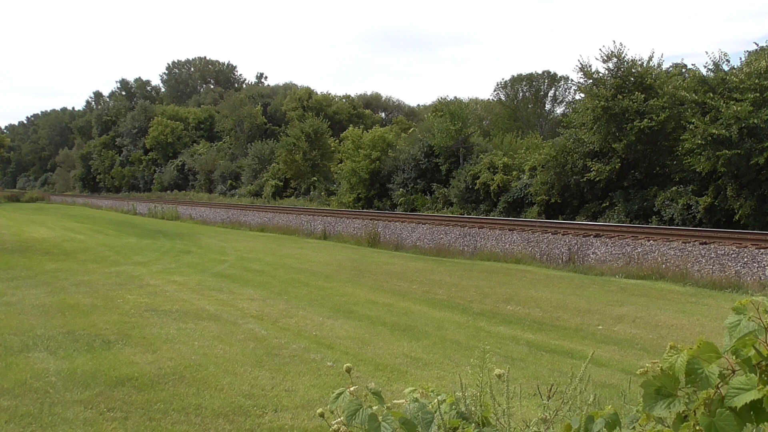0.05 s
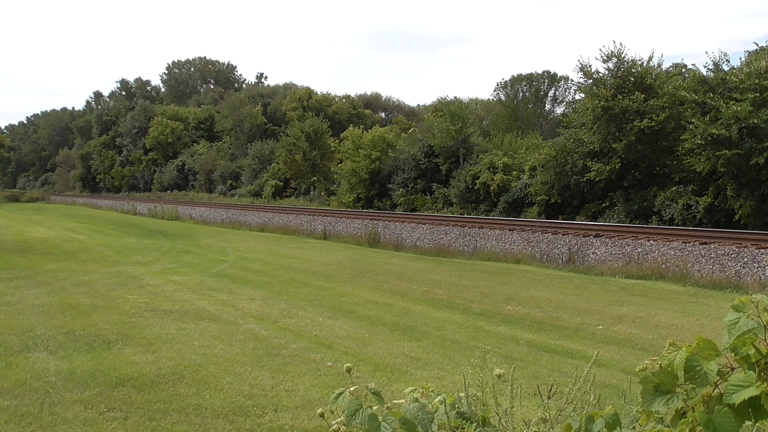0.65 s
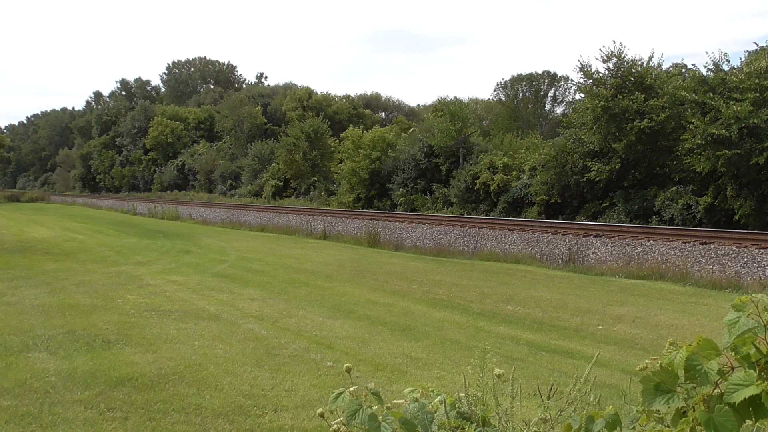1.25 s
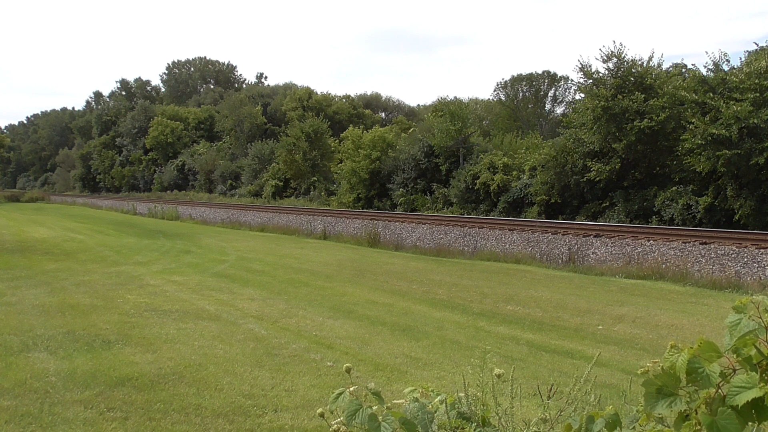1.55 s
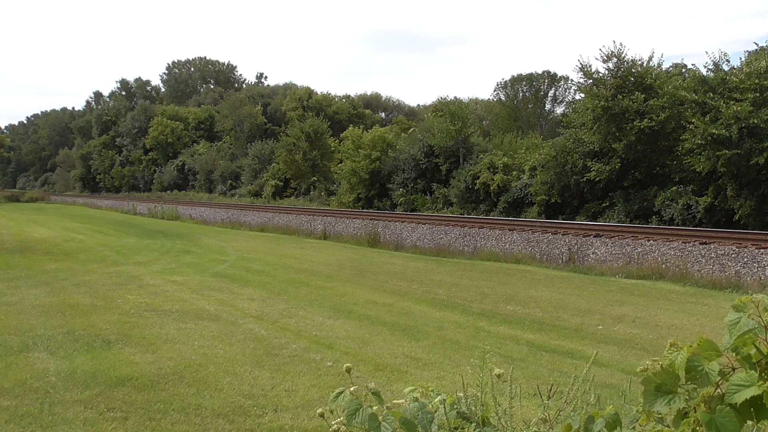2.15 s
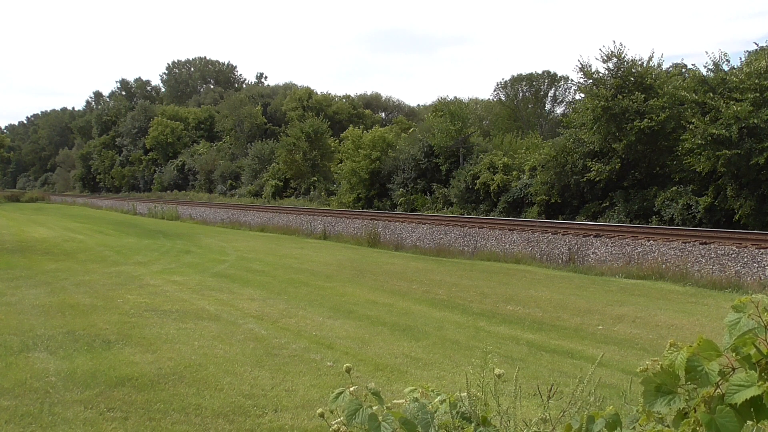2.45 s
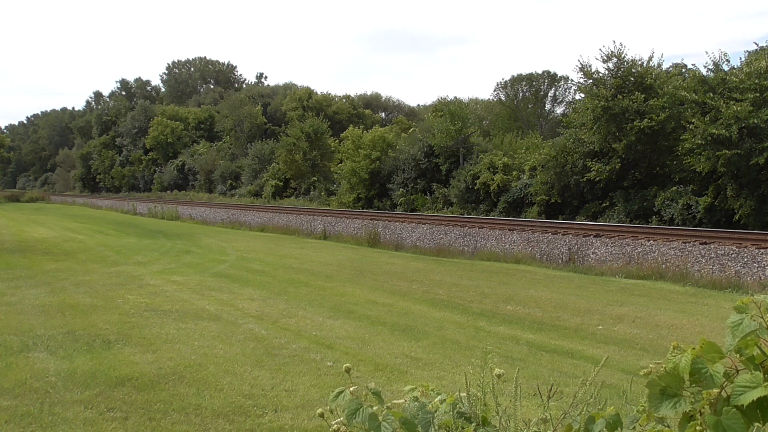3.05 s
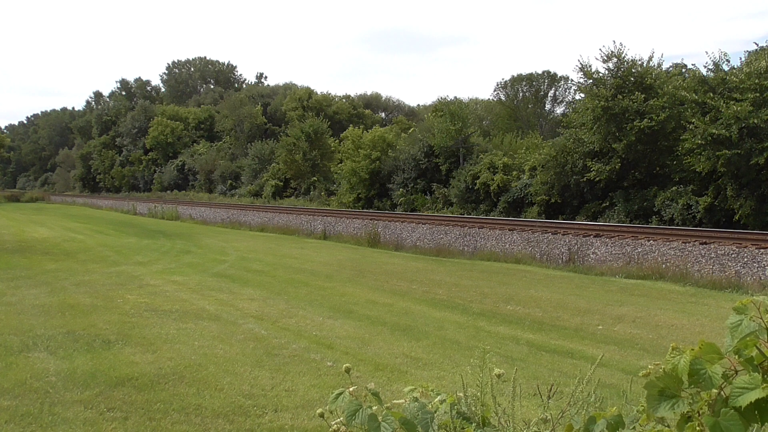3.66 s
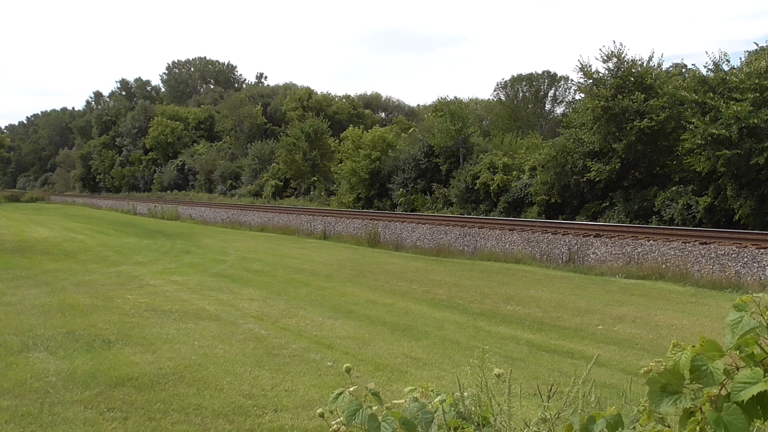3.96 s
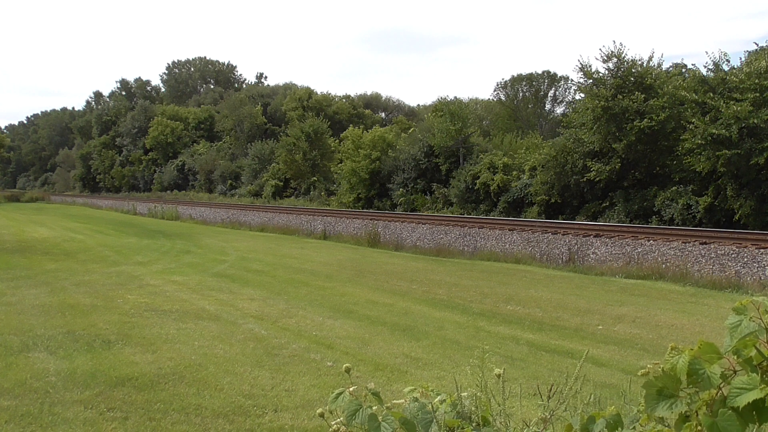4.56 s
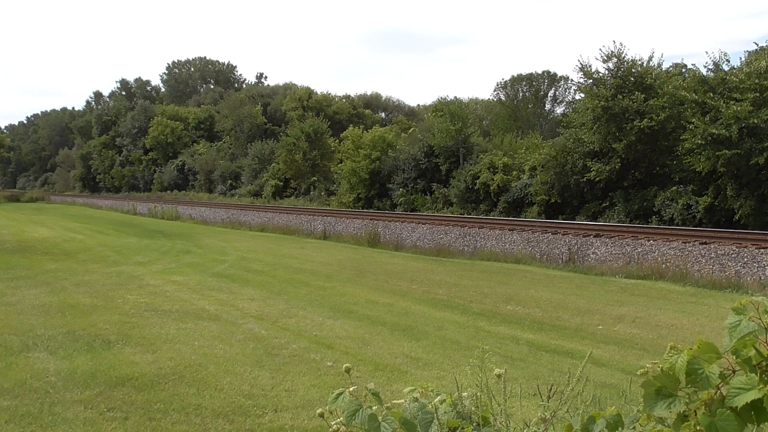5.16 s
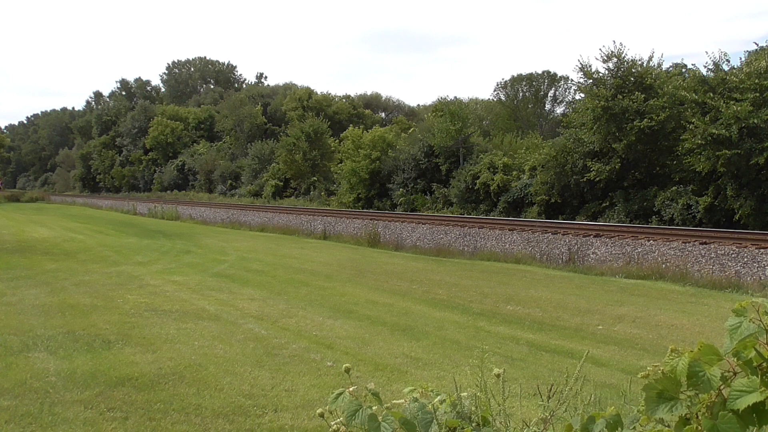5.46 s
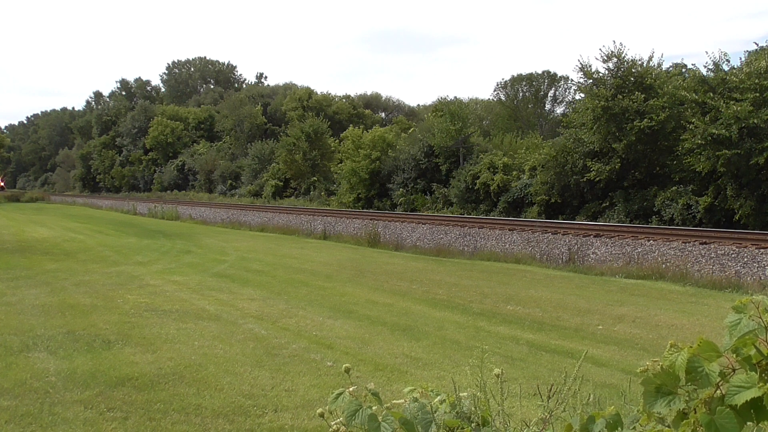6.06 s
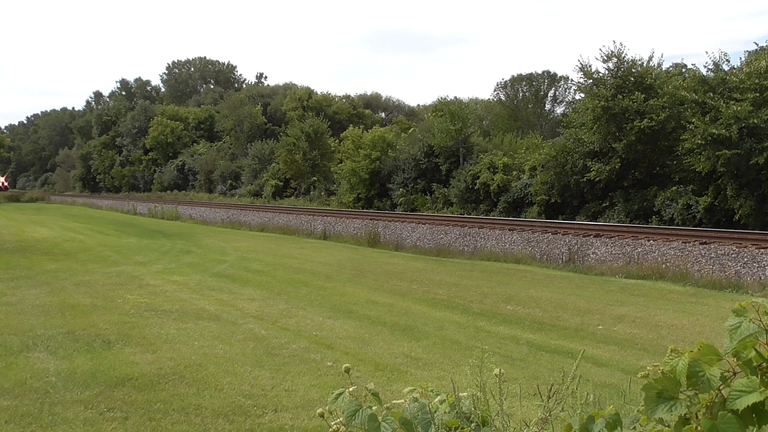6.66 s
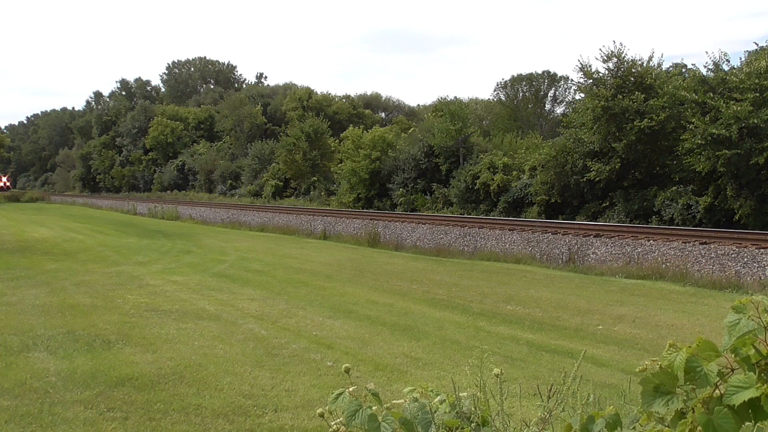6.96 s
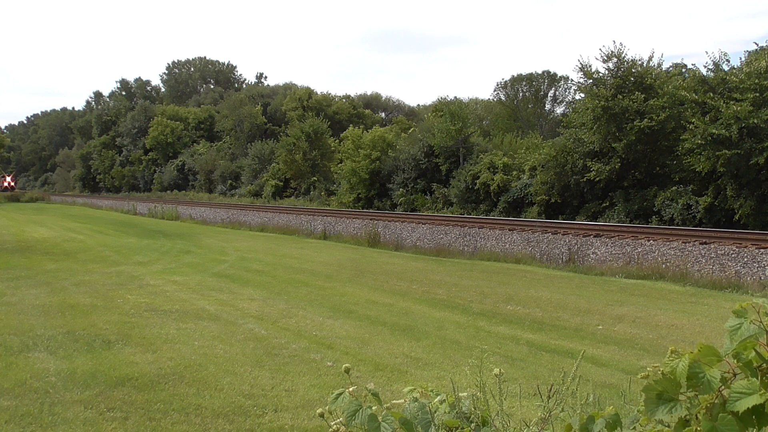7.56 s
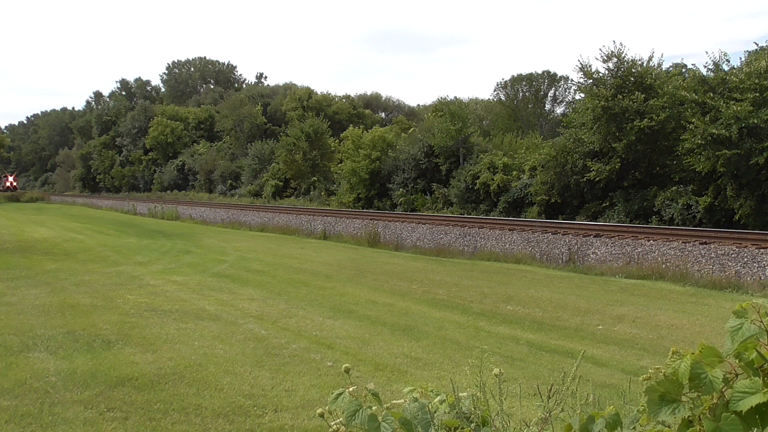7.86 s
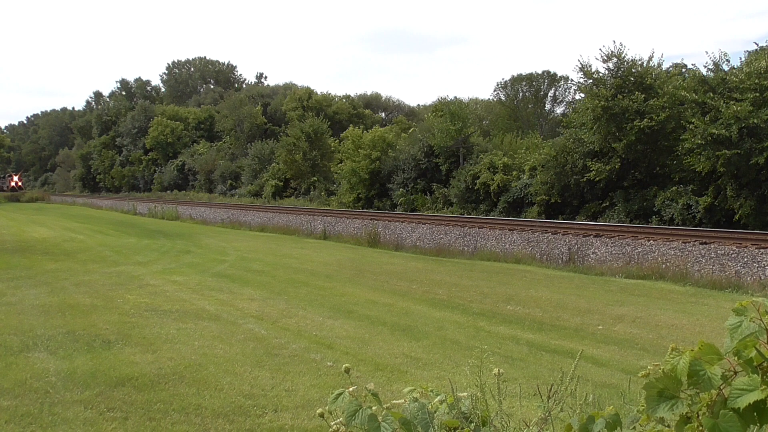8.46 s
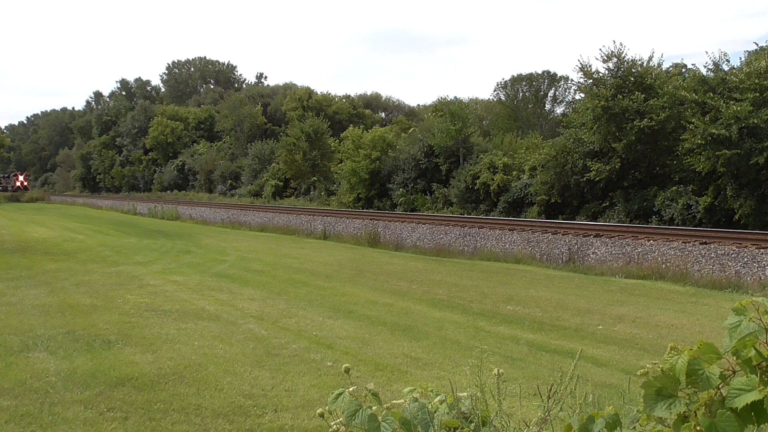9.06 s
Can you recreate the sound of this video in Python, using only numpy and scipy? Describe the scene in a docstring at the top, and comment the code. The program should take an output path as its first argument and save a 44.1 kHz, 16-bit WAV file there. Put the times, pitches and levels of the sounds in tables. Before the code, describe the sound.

Crickets trill close by while a distant diesel train rumbles and throbs, slowly growing louder as its wheels hiss.

```python
"""A summer meadow, a microphone pair in the grass, a diesel freight train a good way down the line.
From the start crickets trill close by, scraping their wings, and a katydid ticks and buzzes now and then;
far off, the exhaust throbs over a low rumble and the cooling fans drone. As the train draws nearer,
its wheels hiss more and more. Past halfway the rails, rubbed by the wheels, start to sing ahead of it.
At the end the train is louder, but still distant."""
import sys
import numpy as np
from scipy import signal
from scipy.fft import rfft, irfft
from scipy.io import wavfile

SR = 44100
rng = np.random.default_rng(int(sys.argv[2]) if len(sys.argv) > 2 else 0)


def bounce(signal):
    """Save signal as a 16-bit WAV file at the path given by the first command-line argument."""
    frames = np.transpose(np.atleast_2d(signal))
    limited = np.clip(frames, -1, 1)
    pcm = np.round(limited * 32767).astype(np.int16)
    wavfile.write(sys.argv[1], SR, pcm)


N = 410571
T = np.arange(N) / SR
HZ = np.fft.rfftfreq(N, 1 / SR)
SHAFT_HZ = 11.927  # crankshaft turns a second


def amp(db):
    """Decibels to gain."""
    return 10 ** (np.asarray(db) / 20)


def unit(x):
    """Scales to an rms of one."""
    return x / np.sqrt(np.mean(abs(x) ** 2) + 1e-20)


def over_frequency(rows, column=1):
    """One column of a table, interpolated along log frequency for every bin."""
    table = np.array(rows)
    return np.interp(np.log(HZ + 1), np.log(table[:, 0] + 1), table[:, column])


def level(rows):
    """Rows of t/s, level/dB as a gain for every sample."""
    return amp(np.interp(T, *np.transpose(rows)))


def approach(far_db, near_db, bend):
    """Gain that grows as the train closes in; a bend above one keeps the rise for late."""
    return amp(far_db + (near_db - far_db) * (T / T[-1]) ** bend)


def swell(start, length, rise_s, fade_s):
    """Rises, holds until its length is over, then dies away."""
    age = T - start
    return np.clip(age / rise_s, 0, 1) * np.exp(-np.maximum(age - length, 0) / fade_s)


def drift(per_s):
    """Complex random wander of rms one, changing about per_s times a second."""
    f = np.fft.fftfreq(8192, 10 / 8192)
    white = rng.standard_normal(len(f)) + 1j * rng.standard_normal(len(f))
    wander = np.fft.ifft(white * np.exp(-.5 * (f / per_s) ** 2))
    return np.interp(T, np.linspace(0, 10, len(f)), unit(wander))


def noise(spectrum, column=1):
    """Two unrelated noises of one colour, at an rms of one."""
    return unit(irfft(rfft(rng.standard_normal((2, N))) * amp(over_frequency(spectrum, column)), N))


def nearing_noise(spectra):
    """Noise whose colour passes from the far spectrum to the near one."""
    near = T / T[-1]
    return np.sqrt(1 - near) * noise(spectra, column=1) + np.sqrt(near) * noise(spectra, column=2)


def mic_pair(pair, likeness, balance_db, lead_rad):
    """Two unrelated sounds become left and right; balance and lead are left over right."""
    a, b = rfft(pair)
    side = amp(balance_db / 2) * np.exp(.5j * lead_rad)
    return irfft(np.array([a * side, (likeness * a + np.sqrt(1 - likeness ** 2) * b) / side]), N)


def far_crickets(gain_db=-3, delay_s=.006, width_s=.01, blur=.74, count=120, balance_db=-3):
    """Lower-voiced crickets farther off: each chirp is one soft stroke, blurred by the grass."""
    # the clearest chirps: t/s, relative level/dB, f/Hz
    clear_chirps = [(0.3336, -52, 4970), (0.8044, -51, 4940), (0.8824, -56, 5030), (1.2276, -51, 4930),
                    (1.942, -54, 4920), (2.4134, -53, 4950), (2.9213, -51, 4920), (3.3877, -53, 4930),
                    (4.1255, -53, 4940), (4.5725, -52, 4960)]
    when, size, pitch = rng.uniform(-1, 1, (count, 3)).T
    faint_chirps = zip((when + 1) / 2 * T[-1], -58.5 + 2.5 * size, 4900 + 140 * pitch)
    chirps = np.zeros(N, complex)
    for s, db, hz in [*clear_chirps, *faint_chirps]:
        span = slice(*np.searchsorted(T, [s - 5 * width_s, s + 5 * width_s]))
        envelope = amp(gain_db + db) * np.exp(-((T[span] - s - delay_s) / width_s) ** 2)
        chirps[span] += envelope * np.exp(2j * np.pi * hz * T[span])
    tone = (chirps * unit(1 + blur * drift(69.9))).real
    side = amp(balance_db / 2)
    return np.array([tone * side, tone / side])


def cricket_chorus(level_db=-52, flicker_db=3):
    """Many crickets across the meadow merge into a wide, flickering band of noise."""
    # colour of the chorus: f/Hz, relative density/dB
    spectrum = [(3000, -40), (4900, -15.5), (6100, -20), (6750, -6.5), (7500, 0), (8300, -0.5),
                (8700, -8.5), (9000, -9), (9250, -21), (12500, -22), (15800, -39)]
    chorus = amp(level_db + flicker_db * drift(35).real) * noise(spectrum)
    return mic_pair(chorus, likeness=.22, balance_db=.46, lead_rad=1.05)


def trill(who, count, first, last, slowing, rasp=.24, uneven_db=.72, uneven_length=.06, overtone_db=-37):
    """Each stroke drags a scraper over the wing's file: a short rasping tone that sags at its end."""
    # one wing stroke for each of two kinds of cricket: t/s from its middle, pitch factor, relative level/dB
    strokes = [
        [(-.013, .98, -24), (-.007, .988, -1.5), (-.002, 1, -0.5), (.003, 1.006, -0.5), (.007, .975, -5),
         (.011, .93, -35)],
        [(-.016, 1, -30), (-.009, .99, 1), (-.004, 1.003, 2.5), (.001, 1.008, -3.5), (.006, .99, -1),
         (.011, .95, -1.5), (.016, .91, -28)],
    ]
    # the singers: kind, f/Hz, level/dB, left minus right/dB, left lead/rad, timing spread/s
    crickets = [(0, 7570, -38.8, 2.5, 0.94, 0.001), (1, 7130, -41, 0, 0.29, 0.001),
                (0, 8470, -41.5, 1, 2.7, 0.0023), (0, 8960, -52.5, 1, 2.5, .002),
                (1, 8080, -48, -3, 2.4, .004)]
    kind, hz, db, balance_db, lead_rad, spread_s = crickets[who]
    shape_s, bend, shape_db = np.transpose(strokes[kind])
    done = np.linspace(0, 1, count)
    middles = first + (last - first) * done * (1 - slowing * (1 - done) / 2)
    middles += spread_s * rng.standard_normal(count)
    nearest = np.searchsorted((middles[1:] + middles[:-1]) / 2, T)  # the stroke each sample belongs to
    age = (T - middles[nearest]) * np.exp(uneven_length * rng.standard_normal(count))[nearest]
    size = amp(db + np.interp(age, shape_s, shape_db) + uneven_db * rng.standard_normal(count)[nearest])
    pitch = hz * np.interp(age, shape_s, bend) * (1 + .004 * rng.standard_normal(count)[nearest])
    tone = np.exp(2j * np.pi * np.cumsum(pitch) / SR)
    scraping = (age > shape_s[0]) & (age < shape_s[-1])
    wing = size * scraping * (tone + amp(overtone_db) * tone ** 2) * (1 + rasp * drift(200))
    side = amp(balance_db / 2) * np.exp(.5j * lead_rad)
    return np.array([(wing * side).real, (wing / side).real])


def near_crickets(scatter_db=-11.5, t60_s=.21):
    """Five crickets close to the microphones; the leaves scatter their trills into a short echo."""
    # trills: cricket, number of strokes, first stroke t/s, last stroke t/s, share by which they slow down
    trills = [(0, 165, .021, 9.263, -.0074), (1, 115, .005, 7.937, .012), (1, 6, 8.975, 9.306, 0),
              (2, 134, .002, 8.04, 0), (2, 8, 8.09, 8.51, 0), (2, 8, 8.87, 9.27, 0), (3, 68, .18, 4, 0),
              (3, 45, 5.88, 8.51, 0), (4, 140, .04, 9.28, 0)]
    direct = sum(trill(*row) for row in trills)
    t = T[:SR // 4]
    leaves = rng.standard_normal((2, len(t))) * amp(-60 * t / t60_s)
    echo = signal.fftconvolve(direct, leaves / np.linalg.norm(leaves[0]), axes=1)[:, :N]
    return direct + amp(scatter_db) * echo


def katydid(tick_s=.006, gap_s=.071, growth_db=3.5, pause_s=.135, buzz_s=.76, strokes_per_s=48):
    """Toneless wing strokes in the grass close by: a few ticks that grow louder, a pause, a fast buzz."""
    # colour of the wing strokes: f/Hz, relative density/dB
    spectrum = [(8500, -25), (10500, 0.5), (12000, -1), (14000, -4), (15800, -1.5)]
    # songs: first tick t/s, number of ticks, first tick level/dB, buzz level/dB
    songs = [(.303, 3, -65, -63), (2.415, 3, -60, -61.5), (4.168, 4, -61, -59.5), (8.433, 3, -62, -60)]
    strokes = 1 + .75 * np.cos(2 * np.pi * strokes_per_s * T + drift(3).real)
    size = np.zeros(N)
    for first, count, tick_db, buzz_db in songs:
        ticks = first + gap_s * np.arange(count)
        for k, s in enumerate(ticks):
            size += amp(tick_db + growth_db * k) * np.exp(-((T - s) / tick_s) ** 2)
        age = T - ticks[-1] - pause_s
        size += amp(buzz_db) * strokes * np.clip(np.minimum(age, buzz_s - age) / .06, 0, 1)
    return mic_pair(size * noise(spectrum), likeness=.8, balance_db=-3, lead_rad=1.5)


def rails(ring_hz=13335, hiss_gain_db=3, modes_gain_db=-1, ring_gain_db=4, flutter=.36):
    """Wheels rub the steel far away; the rails carry the hiss ahead, and one thin mode swells and sings."""
    # colour of the hiss in the rails: f/Hz, relative density/dB
    spectrum = [(8000, -36), (11000, -10.5), (12700, -9), (13200, 1), (14100, 0), (14900, -3), (15300, -3),
                (15800, -8.5)]
    # swells of wheel rub: start t/s, length/s, relative hiss level/dB, relative ring level/dB
    rubs = [(.8, .2, -65, -84), (2.09, .1, -62.5, -79), (3.17, 0.58, -61, -77), (5.56, .31, -61, -59),
            (6.1, .95, -60, -60), (6.21, .22, -56, -53), (6.54, 0.33, -55.5, -45.5), (7.84, .14, -59, -74),
            (8.55, .26, -58, -59), (8.96, .3, -56, -56)]
    # the weaker rail modes: f/Hz
    mode_hz = [11768, 13001, 13248, 13617, 14597, 14695, 15307, 15425]
    # the same modes: relative level/dB
    mode_db = [-23, -20, -10, -24, -17, -21, -18, -23]
    rub = approach(far_db=-68, near_db=-66, bend=.8)
    sing = amp(-86)  # a trace of ringing between the swells
    for start, length, rub_db, sing_db in rubs:
        rub = np.maximum(rub, amp(rub_db) * swell(start, length, rise_s=.047, fade_s=.16))
        sing = np.hypot(sing, amp(sing_db) * swell(start, length, rise_s=.18, fade_s=.17))
    hiss = amp(hiss_gain_db) * rub * noise(spectrum) * (1 + flutter * drift(45).real)
    modes = sum(amp(db) * drift(5) * np.exp(2j * np.pi * hz * T) for hz, db in zip(mode_hz, mode_db))
    ring = amp(ring_gain_db) * sing * np.cos(2 * np.pi * ring_hz * T + .5 * drift(4).real)
    tones = np.sqrt(2) * (ring + amp(modes_gain_db) * rub * modes.real)
    place = dict(balance_db=-4.5, lead_rad=1.76)
    return mic_pair(hiss, likeness=.7, **place) + mic_pair([tones, 0 * T], likeness=1, **place)


def wheels():
    """Rolling wheels hiss; the level climbs, then grows more slowly towards the end."""
    # colour of the wheels: f/Hz, far relative density/dB, near relative density/dB
    spectra = [(790, -21, -3.5), (1530, 3, -0.5), (2060, 5.5, 2.5), (2680, -1, -2.5), (3500, 0.5, .5),
               (4100, -1, 0.5), (4940, -3, -5), (5850, -9, -11), (8300, -10.5, -26), (15900, -47, -38)]
    # the hiss on the approach: t/s, level/dB
    rolling = [(0, -59), (2, -56), (5.5, -50), (9.3, -47.3)]
    return level(rolling) * nearing_noise(spectra)


def cooling_fans(blade_hz=933, turbulence_db=-1, blade_db=-7):
    """A wavering blade tone stands at the top of a band of turbulent drone."""
    # colour of the turbulence: f/Hz, relative density/dB
    spectrum = [(600, -50), (810, -23), (860, -3), (900, 0), (938, -2), (960, -9), (1200, -59)]
    # the drone on the approach: t/s, level/dB
    drone = [(0, -51.5), (1.6, -45.5), (2.4, -47), (3.5, -44), (7.1, -41), (7.6, -38.5), (9.3, -38.5)]
    blade = np.sqrt(2) * unit((1 + .54 * drift(3.7)) * np.exp(2j * np.pi * blade_hz * T)).real
    return level(drone) * (amp(turbulence_db) * noise(spectrum) + amp(blade_db) * np.array([blade, 0 * T]))


def rumble(gain):
    """The low noise of the distant train, lying under the exhaust."""
    # colour of the rumble: f/Hz, relative density/dB
    spectrum = [(15, -38), (30, -12), (46, 1), (65, 1), (95, 3.5), (120, -3), (160, 1), (205, 1), (270, -1),
                (320, -6.5), (400, -14.5), (700, -53)]
    return amp(-.45) * gain * noise(spectrum)


def engine_roar(chug=.032, gust_db=.6):
    """The roar chugs once a crankshaft turn; as it nears, the ground takes out other bands."""
    # colour of the roar: f/Hz, far relative density/dB, near relative density/dB
    spectra = [(200, -24, -44), (290, -4, -20), (367, -11, -8.5), (461, 0, 1), (546, 2, -0.5),
               (649, -1.5, -3), (693, -7, -2.5), (784, -6.5, -2.5), (1003, -7, -7), (1130, -12, -8),
               (1423, -14, -11.5), (1700, -29.5, -23.5), (3000, -54, -44)]
    beat = 1 + chug * np.cos(2 * np.pi * SHAFT_HZ * T + drift(.8).real)
    gusts = amp(gust_db * drift(5.5).real)
    return approach(far_db=-41.5, near_db=-36, bend=1.94) * gusts * beat * nearing_noise(spectra)


def exhaust(bass_gain, firing_order=8, first_beat_s=.0235, sides_db=-2, others_db=2, silencer_rad=.71):
    """Tones at multiples of the crankshaft rate; moving air makes each one swell and fade by itself."""
    # exhaust tones: multiple of the crankshaft rate, relative level/dB
    orders = [(4, -27), (5, -15.5), (6, -14.5), (7, -5.5), (8, 0), (9, -7), (10, -22), (11, -22), (12, -23),
              (13, -17), (14, -20.5), (15, -14.5), (16, -10), (17, -7.5), (18, -26), (19, -17.5),
              (24, -20.5)]
    # the firing tone as it arrives across the field: t/s, level/dB
    firing_levels = [(0.0, -42), (0.72, -46), (1.43, -41.5), (1.53, -48), (3.27, -45.5), (3.47, -40),
                     (4.61, -48), (4.82, -41.5), (7.54, -37), (7.98, -32), (8.24, -38), (8.68, -32.5),
                     (8.89, -41.5), (9.31, -39.5)]
    firing = level(firing_levels)
    turns = SHAFT_HZ * (T - first_beat_s)
    tones = np.zeros(N)
    for order, db in orders:
        if order == firing_order:
            size = firing
        elif abs(order - firing_order) == 1:
            # both neighbours beat with the firing tone once a turn; the silencer's phase softens the throb
            size = amp(sides_db) * np.sqrt(firing * bass_gain) * np.exp(1j * silencer_rad)
            size *= 1 + .22 * drift(.92)
        else:
            size = amp(others_db) * bass_gain * np.exp(2j * np.pi * rng.random())
            size *= 1 + .33 * drift(3)
        tones += amp(db) * (size * np.exp(2j * np.pi * order * turns)).real
    return np.sqrt(2) * np.array([tones, 0 * T])


def train():
    """All the train's sounds reach the microphones together from down the line."""
    # the train at the pair: f/Hz, likeness (0-1), left minus right/dB, left lead/rad
    stereo = [(30, 0.9, -.2, 0), (95, 1, -.6, -0.13), (200, 0.98, -1.1, -0.018), (334, 0.94, -2, 0.59),
              (596, 0.95, -0.3, -0.84), (894, 0.81, 3.5, 0.45), (2000, 0.91, 4, 0.42),
              (4990, 0.84, 1, 0.46)]
    likeness, balance_db, lead_rad = (over_frequency(stereo, column) for column in (1, 2, 3))
    bass_gain = approach(far_db=-42, near_db=-37.5, bend=1.5)
    sound = rumble(bass_gain) + engine_roar() + cooling_fans() + wheels() + exhaust(bass_gain)
    return mic_pair(sound, likeness, balance_db, lead_rad)


def scene():
    """The train, the rails and the insects, heard from one spot in the meadow."""
    return train() + rails() + near_crickets() + cricket_chorus() + far_crickets() + katydid()


def record(dry, edge_hz=15780):
    """The recorder's band limit: a steep low-pass on both channels."""
    lowpass = signal.firwin(1023, edge_hz, window=("kaiser", 9), fs=SR)
    return signal.oaconvolve(dry, lowpass[None], "same")


dry = scene()
out = record(dry)
bounce(out)
```